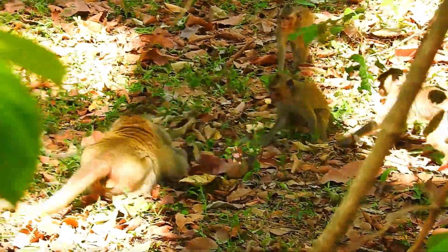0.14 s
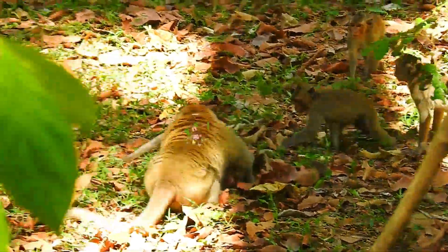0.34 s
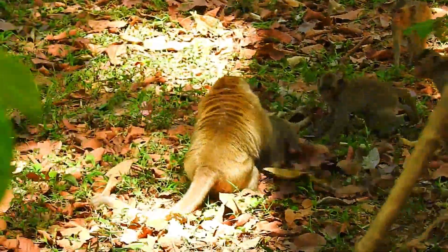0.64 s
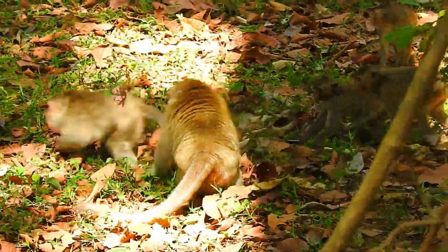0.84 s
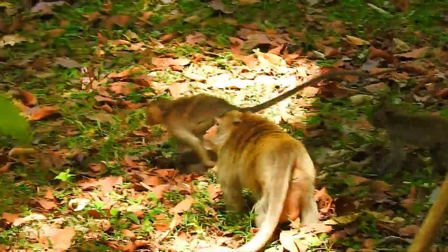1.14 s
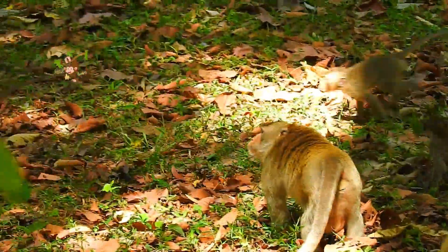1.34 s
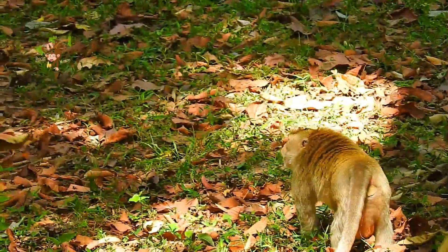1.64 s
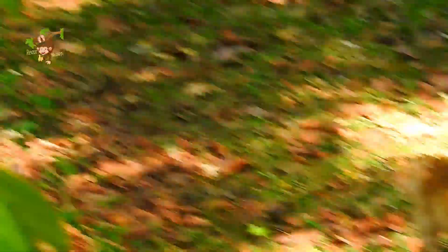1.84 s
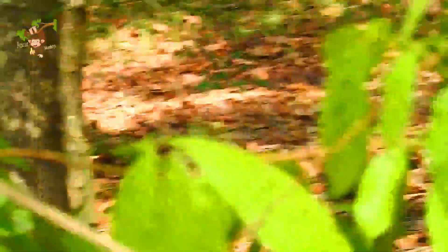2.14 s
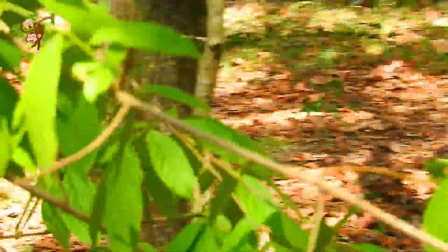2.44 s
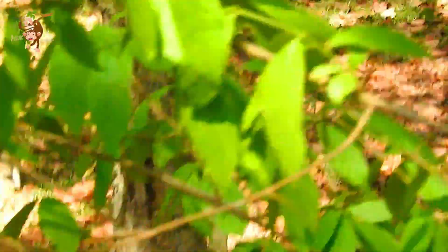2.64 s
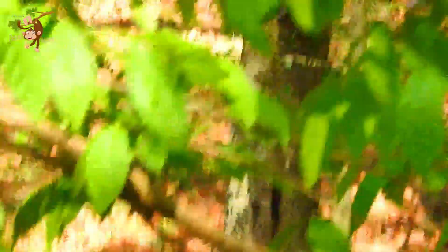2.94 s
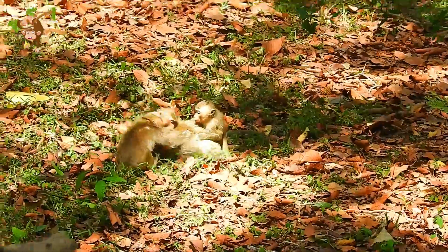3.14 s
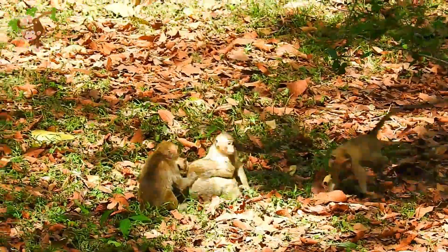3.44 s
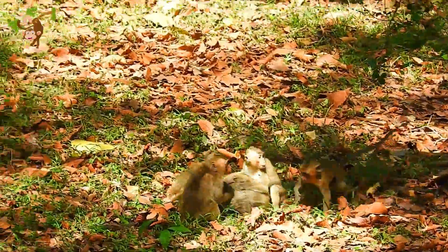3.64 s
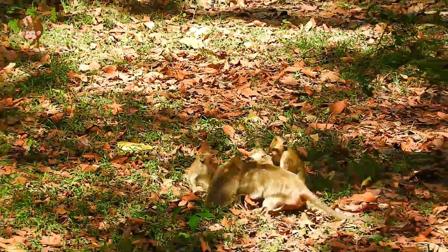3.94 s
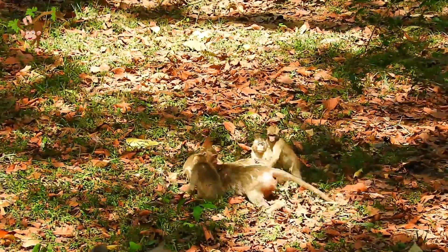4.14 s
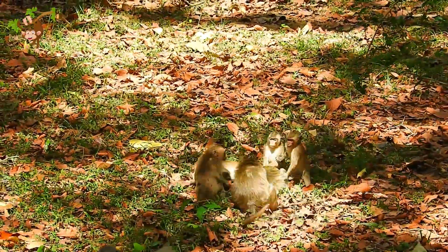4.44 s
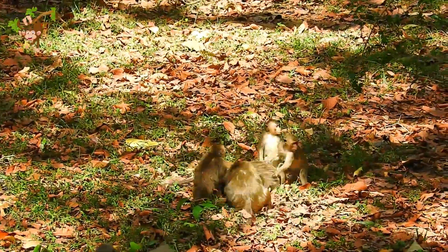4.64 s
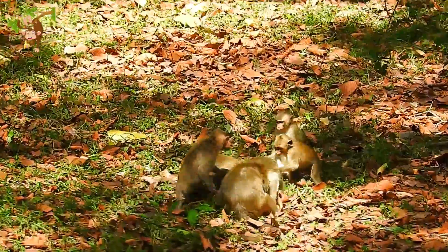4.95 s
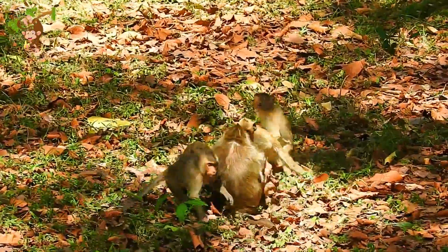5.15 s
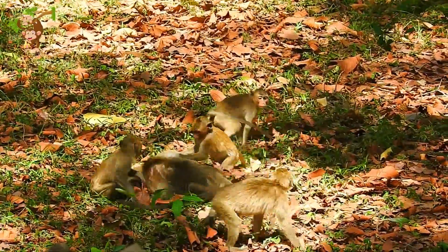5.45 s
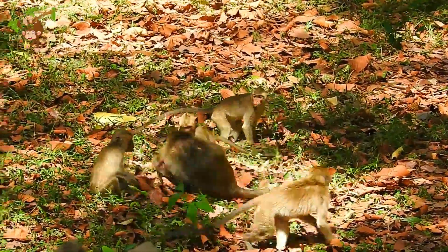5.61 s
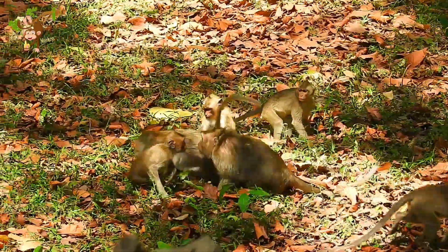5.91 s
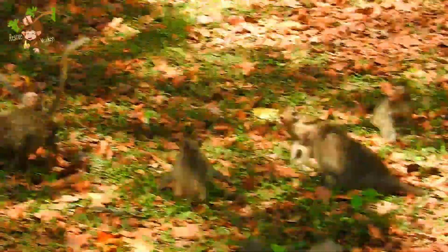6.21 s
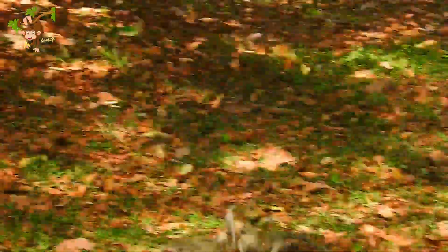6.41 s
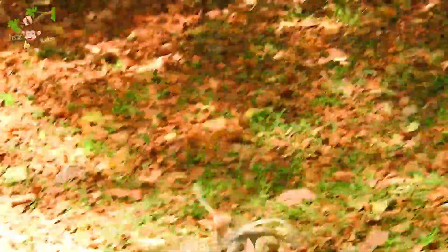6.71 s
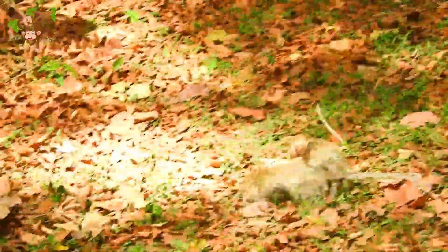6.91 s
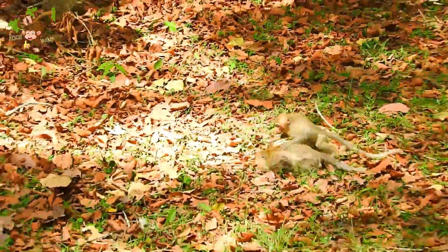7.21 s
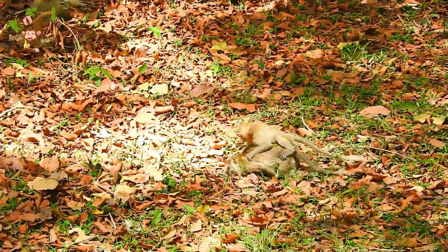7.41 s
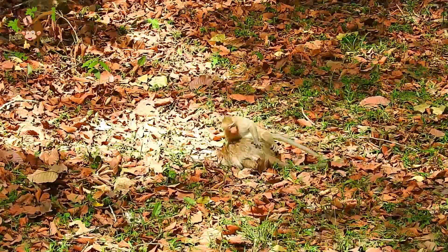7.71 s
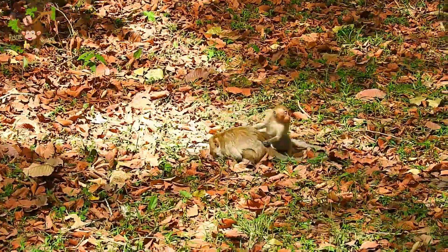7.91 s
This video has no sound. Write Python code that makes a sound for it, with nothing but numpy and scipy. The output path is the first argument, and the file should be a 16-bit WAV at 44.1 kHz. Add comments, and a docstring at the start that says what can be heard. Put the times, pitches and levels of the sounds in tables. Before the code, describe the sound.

A young monkey gives short piercing cries and a long torn shriek while another rasps hoarse grunts. Leaves rustle under running feet and twigs snap around two and a half seconds. All sound drops out briefly near three seconds, then returns louder with more squeals, shrieks and grunts. Outdoor woodland with scattered echoes off trunks, faint air and a low far drone; the microphone is at a modest distance.

```python
"""A young macaque screams in short shrill cries and long shrieks during a scuffle on a forest floor.
Its voice flips between clear tones and torn noise bands; another monkey rasps hoarse grunts, with two soft coos.
Leaf litter crackles as random grains under footfalls, twigs tick and snap as filtered pulses and noise bursts,
trunks scatter the sound as random echoes, over faint air noise and a resonant far drone.
About 3 s in all sound drops out briefly, then returns louder than before."""
import sys
import numpy as np
from scipy import signal
from scipy.fft import rfft, irfft, next_fast_len
from scipy.io import wavfile
from scipy.ndimage import uniform_filter1d, map_coordinates

SR = 44100
rng = np.random.default_rng(int(sys.argv[2]) if len(sys.argv) > 2 else 0)


def int16_out(signal):
    """Quantize to a 16-bit WAV file."""
    q = np.round(np.clip(np.atleast_2d(signal).T, -1, 1) * 32767)
    wavfile.write(sys.argv[1], SR, q.astype(np.int16))


N = 355887  # samples


def amp(db):
    """Decibels to gain."""
    return 10 ** (np.asarray(db) / 20)


def unit(x):
    """Scale to rms 1."""
    return x / np.sqrt(np.mean(x ** 2) + 1e-20)


def along(points, hz):
    """(Hz, value) points interpolated on a log-frequency axis."""
    point_hz, values = np.transpose(points)
    return np.interp(np.log(hz + 1), np.log(point_hz + 1), values)


def curves(rows, t):
    """Each column of a (s, values...) table interpolated at times t."""
    s, *columns = np.transpose(rows)
    return [np.interp(t, s, column) for column in columns]


def wobble(knots_per_s, size):
    """Smooth random curve: a spline through Gaussian knots."""
    knots = rng.standard_normal(int(size * knots_per_s / SR) + 4)
    return map_coordinates(knots, [np.arange(size) * knots_per_s / SR])


def colour(x, points):
    """Filter by a (Hz, dB) spectrum."""
    size = x.shape[-1]
    m = next_fast_len(size + 4096)
    gain = amp(along(points, np.fft.rfftfreq(m, 1 / SR)))
    return irfft(rfft(x, m) * gain, m)[..., :size]


def steady(x):
    """Hold the short-term rms (1/60 s window) at 1."""
    power = np.abs(uniform_filter1d(x ** 2, SR // 60))
    return x / np.sqrt(power + 1e-12)


def span(start_s, end_s, edge_s=.003):
    """Sample times of a call, and a window with linear ramps at both ends."""
    t = np.arange(int((start_s - edge_s) * SR), int((end_s + edge_s) * SR)) / SR
    return t, np.clip(np.minimum(t - t[0], t[-1] - t) / (2 * edge_s), 0, 1)


def add(track, start_s, x):
    """Mix x into the track in place, cut off at the track's end."""
    part = track[..., max(round(start_s * SR), 0):][..., :x.shape[-1]]
    part += x[..., :part.shape[-1]]


def phase_of(hz):
    """Phase in radians, integrated from a frequency curve."""
    return 2 * np.pi * np.cumsum(hz) / SR


def blend(tone, noise, share):
    """Power-preserving mix; share is the noise part of the power."""
    share = np.clip(share, 0, 1)
    return np.sqrt(1 - share) * tone + np.sqrt(share) * noise


def monkeys(lead_s=.003):
    """Screams, grunts and coos; the animals keep moving, so each call takes new paths through the trees."""
    # short cries: start_s, length_s, pitch_top_place (0-1), loudest_place (0-1), first_hz, top_hz, last_hz,
    # first_rough (0-1), last_rough (0-1), fundamental_db, mouth_db, shrill_db
    cries = [ (0.107, .06, .05, 0.44, 1460, 1456, 1125, 0.07, 0.18, -35, -55, -75.5),
             (0.35, 0.14, 0.4, 0.35, 1540, 1587, 1615, .45, 0.5, -60, -43.5, -45),
             (.928, .07, .45, .35, 1810, 2334, 2204, .6, 0.4, -33, -39, -33),
             (1.027, .085, .35, .45, 2088, 2110, 1790, .3, 0.3, -26.5, -53, -33),
             (1.421, .054, .95, .42, 1558, 1846, 1900, .6, .55, -35, -46, -21.5),
             (1.789, .18, 0.2, 0.39, 1854, 1950, 1446, 0.88, .95, -34, -39, -34.5),
             (2.081, 0.085, .05, 0.9, 2067, 2050, 1638, .42, .42, -30, -65, -40.5),
             (2.161, .11, 0, 0.7, 1727, 1815, 1557, 0.3, 0.1, -31.5, -39, -35.5),
             (3.229, .08, .47, 0.87, 1784, 1910, 1728, 0.3, 0.11, -42.5, -50, -32.5),
             (3.303, .08, 0.08, 0.49, 1720, 1694, 1564, 0.25, 0.3, -38, -55, -34),
             (3.639, 0.096, .05, 0.1, 1525, 1510, 1397, .4, .8, -59, -61, -45),
             (4.175, .1, 0.2, 0.32, 2058, 2075, 1866, 0.67, .85, -39, -42.5, -51),
             (4.75, .056, .9, 0.72, 2020, 2355, 2320, 0.2, 0.3, -46.5, -74.5, -45),
             (4.801, .075, .35, 0.32, 2260, 2256, 1630, 0.7, 0.94, -26, -37.5, -47),
             (5.054, 0.0907, 0.5, 0.15, 1506, 1850, 1800, 0.4, .6, -50, -78.5, -57),
             (5.524, .047, 0.5, .46, 1728, 2360, 2320, 0.08, .12, -36.5, -36, -27.5),
             (5.908, .1, .75, 0.87, 1744, 2199, 2146, 0.25, .5, -46.5, -74, -33),
             (6.007, 0.09, .05, 0.15, 1898, 1773, 1558, 0.5, 0.3, -43, -77, -28),
             (6.415, 0.078, 1, .8, 1480, 1572, 1520, 0, 0.2, -45.5, -69.5, -53.5),
             (6.487, .12, .95, .35, 1590, 1847, 1770, 0.65, .85, -37, -43, -34),
             (6.751, .105, .28, 0.38, 1840, 2091, 1562, 0.81, 0.4, -35, -40, -27.5),
             (7.018, 0.06, 0.06, 0.43, 1860, 1866, 1850, .4, 0.25, -58, -50, -79),
             (7.334, 0.047, .95, 0.46, 1513, 1612, 1620, 0, 0.3, -42.5, -82.5, -45.5),
             (7.511, 0.048, 1, 0.8, 2270, 2143, 2122, .15, 0.13, -63, -64.5, -58.5)]
    # larynx in each long shriek: time_s, pitch_hz, roughness (0-1)
    larynxes = [
        [(.47, 2219, 0.64), (.545, 2131, .85), (.58, 2656, 1), (.65, 2539, .9), (.695, 1790, 0.63),
         (.72, 1720, 0.51), (.755, 1620, 0.51), (.785, 1324, 0.7), (.83, 1220, .45)],
        [(4.39, 2104, .4), (4.435, 2194, 0.5), (4.47, 2470, 1), (4.52, 2346, 0.7), (4.56, 2473, 0.9)],
        [(5.12, 2104, 0.7), (5.145, 2190, 0.2), (5.195, 1452, 0.4), (5.24, 1551, .33), (5.28, 1486, 0.1),
         (5.315, 1879, 0.8), (5.37, 1243, 0.4)],
        [(5.59, 2450, .8), (5.61, 2500, .9), (5.645, 1609, 0.8), (5.685, 1701, 0.2), (5.72, 1433, .12),
         (5.77, 1411, .1)],
    ]
    # level curves of each long shriek: time_s, fundamental_db, mouth_db, shrill_db
    shriek_levels = [
        [(0.466, -47.5, -46.5, -33.5), (0.484, -29, -25, -19), (0.532, -30.5, -25.5, -23),
         (0.576, -37.5, -37.5, -27.5), (0.654, -34.5, -49, -26.5), (0.66, -45, -37, -27.5),
         (0.718, -36, -23, -29), (0.796, -37.5, -34, -56.5), (0.82, -48.5, -31, -71)],
        [(4.405, -42.5, -49.5, -35), (4.417, -31, -43, -27.5), (4.471, -31.5, -20, -27.5),
         (4.481, -22.5, -27, -40), (4.499, -28.5, -37, -36.5), (4.513, -20.5, -29.5, -38),
         (4.543, -33, -21.5, -47), (4.559, -31, -57, -47.5), (4.57, -23, -39.5, -45)],
        [(5.125, -43, -66, -55), (5.149, -23.5, -62, -40), (5.167, -27, -44, -37), (5.223, -35.5, -41, -40.5),
         (5.243, -29, -25.5, -34.5), (5.289, -26, -41, -36), (5.311, -39, -28, -38), (5.323, -26, -28, -42.5),
         (5.38, -54, -37, -48.5)],
        [(5.595, -68, -40, -26), (5.617, -25.5, -38.5, -36), (5.629, -40.5, -19, -24.5),
         (5.645, -32, -27, -28.5), (5.667, -40, -28, -31), (5.679, -31.5, -27, -31.5), (5.727, -33, -25.5, -34),
         (5.763, -38, -46, -44), (5.775, -42, -50, -44)],
    ]
    # loudness of each long shriek's parts, added to its level curves: fundamental_db, mouth_db, shrill_db
    shriek_loudness = [(0.5, 2, -2.8), (-2.5, -7, -3.29), (-4.5, -0.5, -4.5), (-5, 1, -2)]
    # other monkey's grunts: start_s, length_s, loudest_place (0-1), first_throat_hz, last_throat_hz, level_db
    grunts = [ (0.882, 0.13, 0.1, 1000, 1005, -46), (1.598, 0.1, 0.72, 1292, 1297, -25.5),
              (2.448, .23, 0.75, 874, 1149, -42.5), (3.714, 0.083, 0.8, 939, 995, -54.5),
              (3.959, 0.168, 0.57, 1122, 1086, -53), (4.54, 0.19, 0.69, 1458, 1112, -46.5),
              (6.202, 0.33, 0.85, 1004, 1160, -60), (7.081, .08, 0.56, 939, 964, -58),
              (7.277, 0.028, 0.39, 930, 960, -62)]
    # coos: start_s, length_s, pitch_hz, level_db
    coos = [(0, 0.0387, 532, -54.5), (2.38, 0.082, 507.7, -56.5)]
    calls = [short_cry(*row) for row in cries]
    calls += [shriek(*parts) for parts in zip(larynxes, shriek_levels, shriek_loudness)]
    calls += [grunt(*row) for row in grunts]
    calls += [coo(*row) for row in coos]
    track = np.zeros((2, N))
    for start_s, call in calls:
        padded = np.pad(call, (0, SR // 2))  # room for echoes
        add(track, start_s - lead_s, forest(padded, near_db=4.5, tail_db=-2.0))
    return track


def short_cry(start_s, length_s, top, crest, first_hz, top_hz, last_hz, first_rough, last_rough, *parts_db):
    """One arch of pitch and one push of air; fundamental, mouth and shrill parts crest at different lags."""
    # swell of fundamental, mouth ring, shrill overtones: crest_lag (share of cry), rise_db, fall_db
    part_swells = [(0, 15, 12.5), (0.099, 12.5, 4), (0.023, 7, 7)]
    push_db_per_db, soft_db = 0.18, -38  # extra swell for each dB above a soft part
    t, window = span(start_s, start_s + length_s)
    u = np.clip((t - start_s) / length_s, 0, 1)
    top = np.clip(top, .02, .98)
    arch = np.sin(np.pi / 2 * np.interp(u, [0, top, 1], [0, 1, 0])) ** 2
    pitch_hz = arch * top_hz + (1 - arch) * np.where(u < top, first_hz, last_hz)
    levels_db = []
    for db, (lag, rise_db, fall_db) in zip(parts_db, part_swells):
        push_db = push_db_per_db * max(db - soft_db, 0)
        push = swell(t, start_s, length_s, crest + lag, rise_db + push_db, fall_db + push_db)
        levels_db.append(db + push)
    rough = first_rough + u * (last_rough - first_rough)
    return cry(t, window, pitch_hz, rough, *levels_db)


def shriek(larynx, levels, loudness_db):
    """A long torn scream whose pitch lurches up and down."""
    t, window = span(levels[0][0], levels[-1][0])
    pitch_hz, rough = curves(larynx, t)
    levels_db = [curve_db + part_db for curve_db, part_db in zip(curves(levels, t), loudness_db)]
    return cry(t, window, pitch_hz, rough, *levels_db)


def cry(t, window, pitch_hz, rough, low_db, mouth_db, shrill_db, jitter=0.0605, tear=0.089, waver=0.0138,
        flutter_db=1.5, hiss=1.0, breathy=0.068, slope_db_per_octave=-2, folds_db=4, torn=1.11, spread_hz=620):
    """One scream: the harder the folds are strained, the more chaotic their pitch and strength."""
    # ring of the wide-open mouth: freq_hz, level_db
    mouth_ring = [(1200, -70), (1800, -16), (2400, 2), (2900, 1.5), (3400, 1), (4400, -4), (5200, -9),
                  (7000, -28.5), (9000, -78)]
    # strained throat of a torn shriek: freq_hz, level_db
    torn_throat = [(1800, -81), (3000, -32.5), (4200, -15), (5200, -6), (6000, 1.5), (6700, -3.5),
                   (7500, -4.5), (8500, -14), (10000, -23.5), (12000, -30), (15500, -48.5)]
    # tight throat of a clear squeal: freq_hz, level_db
    clear_throat = [(2000, -76.5), (3500, -48), (4500, -24.5), (5500, 3.5), (6200, 4.5), (6800, 7.5),
                    (7400, -0.5), (8300, -10.5), (10000, -20), (12000, -35.5), (15500, -51)]
    size = len(t)
    rough = np.clip(rough, 0, 1)
    pitch_hz = pitch_hz * (1 + waver * wobble(258, size))
    chaos = rough * jitter * wobble(500, size) + rough ** 2 * tear * wobble(1800, size)
    phase = phase_of(pitch_hz * (1 + chaos))
    # the fundamental tears from a pure whistle into a band of noise
    whistle = np.sqrt(2) * np.sin(phase_of(pitch_hz))
    low = blend(whistle, rasp(phase_of(pitch_hz), spread_hz), torn * rough ** 2)
    # each overtone swells and fades on its own
    order = np.arange(2, 12)[:, None]
    drift = np.array([wobble(55.3, size) for _ in order])
    strength = amp(slope_db_per_octave * np.log2(order) + folds_db * drift)
    below_nyquist = order * pitch_hz < SR / 2
    overtones = unit(np.sum(strength * np.sin(order * phase) * below_nyquist, axis=0))
    # turbulent air escapes once in each cycle
    air = unit(rng.standard_normal(size) * (1 + 1.1 * np.cos(phase)))
    buzz = blend(overtones, air, 0.045 + hiss * rough ** 2)
    breath = blend(overtones, air, breathy + hiss * rough ** 2)
    mouth = steady(colour(breath, mouth_ring))
    # a torn voice spreads over a wider band than a clear one
    shrill = steady(rough * colour(buzz, torn_throat) + (1 - rough) * colour(buzz, clear_throat))
    flutter = unit(amp(flutter_db * wobble(201.6, size)))
    upper = amp(mouth_db - 7.0) * mouth + amp(shrill_db) * shrill
    return t[0], window * (amp(low_db) * low + flutter * upper)


def rasp(phase, width_hz):
    """Chaotic vibration: a band of noise, rms 1, centred on a moving pitch."""
    in_phase = wobble(width_hz, len(phase)) * np.sin(phase)
    quadrature = wobble(width_hz, len(phase)) * np.cos(phase)
    return unit(in_phase + quadrature)


def swell(t, start_s, length_s, crest, rise_db, fall_db):
    """One push of air in dB: it rises to 0 at its crest and falls away."""
    crest = np.clip(crest, .02, .98)
    return np.interp((t - start_s) / length_s, [0, crest, 1], [-rise_db, 0, -fall_db])


def grunt(start_s, length_s, crest, first_hz, last_hz, level_db,
          rattle_hz=85, rattle_db=5.0, width_hz=560, chest_db=-7, rise_db=8, fall_db=14.5):
    """A hoarse rasp in the throat, chopped by its slack, uneven flapping."""
    # chest noise: freq_hz, level_db
    chest_spectrum = [(150, -39), (300, -27.5), (600, -11.5), (900, 0), (1400, 10.5), (1700, -4),
                      (3000, -32), (6000, -39), (10000, -70.5)]
    t, window = span(start_s, start_s + length_s)
    throat = rasp(phase_of(np.linspace(first_hz, last_hz, len(t))), width_hz)
    chest = amp(chest_db) * unit(colour(rng.standard_normal(len(t)), chest_spectrum))
    rattle = amp(rattle_db * wobble(2 * rattle_hz, len(t)))
    voice = unit((throat + chest) * rattle)
    push_db = swell(t, start_s, length_s, crest, rise_db, fall_db)
    return t[0], window * amp(level_db + push_db) * voice


def coo(start_s, length_s, pitch_hz, level_db):
    """A round, nearly pure note that sags 6 % in pitch."""
    u = np.linspace(0, 1, int(length_s * SR))
    phase = phase_of(pitch_hz * (1 + .06 * (.5 - u)))
    return start_s, amp(level_db + 5.0) * np.sin(np.pi * u) * np.sin(phase)


def forest(x, near_db, tail_db, near_t60_s=0.048, tail_onset_s=0.01):
    """Direct sound, a quick scatter off ground and foliage, then the tail from the trunks."""
    # tail decay: freq_hz, t60_s
    trunk_decay = [(300, 1), (1500, 0.35), (6000, 0.47), (9000, 0.33), (14000, 0.43)]
    hz, t, z = signal.stft(rng.standard_normal((2, SR * 3 // 4)), SR, nperseg=256)
    decay = amp(-60 * t / along(trunk_decay, hz)[:, None])
    tail = signal.istft(z * decay, SR, nperseg=256)[1]
    t = np.arange(tail.shape[1]) / SR
    tail = tail * (1 - np.exp(-t / tail_onset_s))
    near = rng.standard_normal(tail.shape) ** 3 * amp(-60 * t / near_t60_s)  # cubed: sparse peaks
    scattered = 0
    for db, response in [(near_db, near), (tail_db, tail)]:
        echo = signal.fftconvolve(x[None], response, axes=1)[:, :len(x)]
        scattered = scattered + amp(db) * echo / np.linalg.norm(echo, axis=1, keepdims=True)
    # each returns a set share of the sound's energy
    return x + np.linalg.norm(x) * scattered


def snaps(crack_t60_s=0.025, knock_t60_s=0.0803, crack_gain_db=-3, knock_gain_db=1, dull_db=-24):
    """Leaves and sticks break underfoot: a splintering crack over a short woody knock, duller for thick sticks."""
    # breaks: start_s, crack_db, knock_db, brightness_hz
    breaks = [(2.4508, -36.5, -44, 4380), (2.4679, -21.5, -31.5, 7550), (2.5162, -25, -37.5, 1590),
              (2.5475, -22.5, -32.5, 3070), (3.5144, -44.5, -69.5, 6760), (3.7321, -33.5, -47, 5340),
              (3.7494, -62, -43, 5400), (3.8643, -79, -86, 5810), (6.289, -63, -60.5, 5680),
              (7.2633, -61, -56, 3050), (7.2804, -50, -51, 3060)]
    # woody knock: freq_hz, level_db
    knock_spectrum = [(250, -35), (650, -2), (900, 9), (1300, -3), (2500, -18), (5000, -45)]
    # splintering: freq_hz, level_db
    crack_spectrum = [(500, -29), (1500, -9.5), (3300, -2.5), (7000, 7), (9500, -11), (15000, -42)]
    track = np.zeros(N)
    t = np.arange(SR // 8) / SR
    for start_s, crack_db, knock_db, bright_hz in breaks:
        splinters = colour(rng.standard_normal(len(t)) ** 3, crack_spectrum)
        splinters = colour(splinters, [(bright_hz, 0), (4 * bright_hz, dull_db)])
        crack = unit(splinters) * amp(crack_db + crack_gain_db - 60 * t / crack_t60_s)
        wood = unit(colour(rng.standard_normal(len(t)), knock_spectrum))
        knock = wood * amp(knock_db + knock_gain_db - 60 * t / knock_t60_s)
        add(track, start_s, crack + knock)
    return track


def ticks(gain_db=4):
    """A twig close by gives way in one short dull push, without ringing."""
    # ticks: time_s, peak_db
    tick_rows = [(0.917, -22.5), (2.067, -33.5), (2.084, -16)]
    # push: freq_hz, level_db
    push_spectrum = [(200, -28), (600, -15.5), (1100, 3.5), (1700, 4), (2200, -6.5), (3200, -26.5),
                     (6000, -50.5)]
    track = np.zeros(N)
    push = colour(signal.unit_impulse(SR // 50, "mid"), push_spectrum)
    for time_s, peak_db in tick_rows:
        add(track, time_s - .009, amp(peak_db + gain_db) * push / push.max())  # pulse centre is 10 ms in
    return track


def litter(fractures_per_s=6000, spread_db=3, clump_db=0.63, level_db=-1):
    """Dry leaves crackle in clumps of tiny fractures under running feet."""
    # rustle: freq_hz, level_db_per_hz
    leaf_spectrum = [(200, -39.5), (700, -8), (1500, -10), (2500, -16), (3400, -8), (4300, -5.5),
                     (5200, -1.5), (6500, -0.5), (8000, -14), (10400, -25), (15500, -47)]
    fractures = (rng.random((2, N)) < fractures_per_s / SR) * rng.standard_normal((2, N))
    sizes = amp(spread_db * np.minimum(rng.exponential(size=N), 4))
    grains = unit(fractures * sizes) + 1.2 * rng.standard_normal((2, N))
    rustle = unit(colour(grains + 0.045 * grains[::-1], leaf_spectrum))  # slight channel crossfeed
    return rustle * footwork() * amp(level_db + clump_db * wobble(60, N))


def footwork(rise_s=0.15, t60_s=0.13):
    """Stirring of the leaves: a low rustle, and a surge at every step as they give way, then settle."""
    # rustle between steps: time_s, level_db
    scuffle = [(0, -52.5), (.3, -65.5), (1.1, -51), (1.35, -54), (1.6, -48), (2.5, -46.5), (2.85, -63),
               (3.15, -60.5), (4.3, -64.5), (5, -72), (6.2, -61.5), (6.75, -45), (7.05, -69.5),
               (8.07, -66.5)]
    # bounds and footfalls: time_s, level_db
    steps = [(0.01, -57), (1.219, -44.5), (1.529, -41.5), (1.68, -41.5), (1.98, -38.5), (2.386, -41.5),
             (2.596, -38), (3.52, -65), (3.679, -44.5), (3.768, -48), (3.867, -53), (4.072, -47),
             (4.149, -51.5), (6.289, -47.5), (6.41, -51.5), (6.7, -45), (7.12, -59)]
    t = np.arange(N) / SR
    power = amp(curves(scuffle, t)[0]) ** 2
    for step_s, level_db in steps:
        distance = np.maximum((step_s - t) / rise_s, (t - step_s) / t60_s)  # in units of 60 dB
        power += amp(level_db - 60 * np.minimum(distance, 2)) ** 2
    return np.sqrt(power)


def background(air_db=-69.0, drone_gain_db=0, sway_db=5.5):
    """Faint forest air, and a far drone whose resonances drift in strength."""
    # still air among the trees: freq_hz, level_db_per_hz
    air_spectrum = [(20, -40), (35, -25.5), (60, -1), (130, -9), (300, -9.5), (450, -7.5), (700, -4.5),
                    (1000, -3.5), (1500, -6.5), (2400, -9), (3900, -17), (5900, -19), (7500, -14.5),
                    (10000, -34), (15500, -47)]
    # drone resonances: freq_hz, width_hz, level_db
    resonances = [(62, 24, -1), (118.2, 20, -0.5), (169.7, 14, 5.5), (228.05, 25.2, 2), (286.7, 13.8, -1.5),
                  (344, 33, -6)]
    # drone level: time_s, level_db
    drone_level = [(0, -63.5), (1.3, -64), (1.9, -59), (3.3, -66), (4.3, -70), (5.5, -67), (6.1, -71.5),
                   (6.4, -62.5), (7.1, -67.5), (8.07, -71)]
    air = rng.standard_normal((2, N))
    air = unit(colour(air + 0.15 * air[::-1], air_spectrum)) * amp(air_db + 0.49 * wobble(3, N))
    m = next_fast_len(N)
    hz = np.fft.rfftfreq(m, 1 / SR)
    far = rfft(rng.standard_normal((2, m)))
    far = far + 0.15 * far[::-1]
    drone = np.zeros((2, N))
    for centre_hz, width_hz, db in resonances:
        band = irfft(far / (1 + (2 * (hz - centre_hz) / width_hz) ** 2), m)[:, :N]
        drone += band * amp(db + sway_db * wobble(3.7, N))
    drone = unit(colour(drone, [(22, -19.5), (50, -9.5)]))
    return air + drone * amp(curves(drone_level, np.arange(N) / SR)[0] + drone_gain_db)


def scene(right_db=0.1):
    """The fight very slightly to the right, breaking twigs, rustling litter, the forest all around."""
    fight = amp(-7.5) * amp([[-right_db], [right_db]]) * monkeys()
    sticks = amp(-3) * forest(snaps(), near_db=-7.0, tail_db=-4.5)
    twigs = forest(ticks(), near_db=-7.5, tail_db=-5.5)
    return fight + sticks + twigs + litter() + background()


def record(dry, top_hz=15700):
    """All sound drops out briefly and returns louder; nothing is kept above the band limit."""
    # overall gain through the dropout: time_s, gain_db
    dropout = [(2.87, 1), (2.9, -30), (2.93, -74), (3.08, -55), (3.11, -13), (3.125, 7.5)]
    gated = dry * amp(curves(dropout, np.arange(N) / SR)[0])
    m = next_fast_len(N + SR // 4)
    in_band = np.fft.rfftfreq(m, 1 / SR) < top_hz
    return irfft(rfft(gated, m) * in_band, m)[:, :N]


dry = scene()
out = record(dry)
int16_out(out)
```